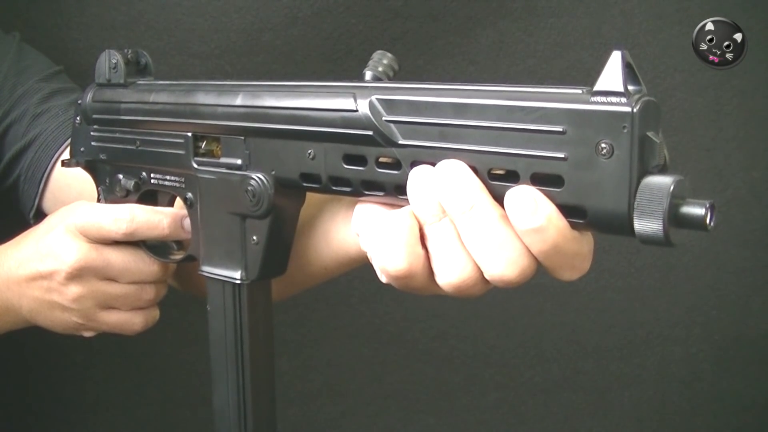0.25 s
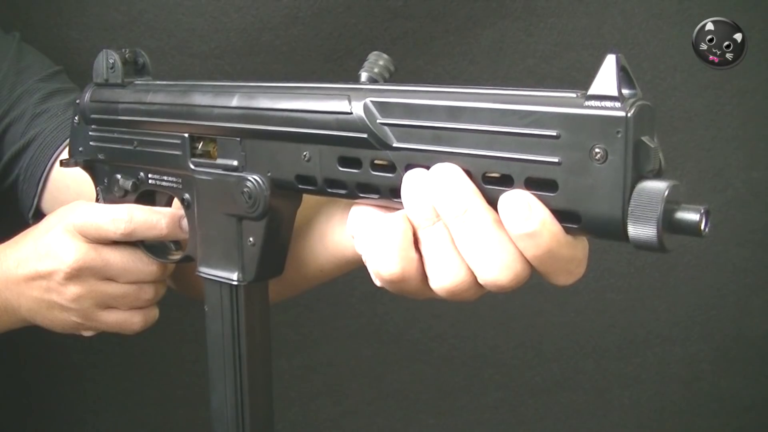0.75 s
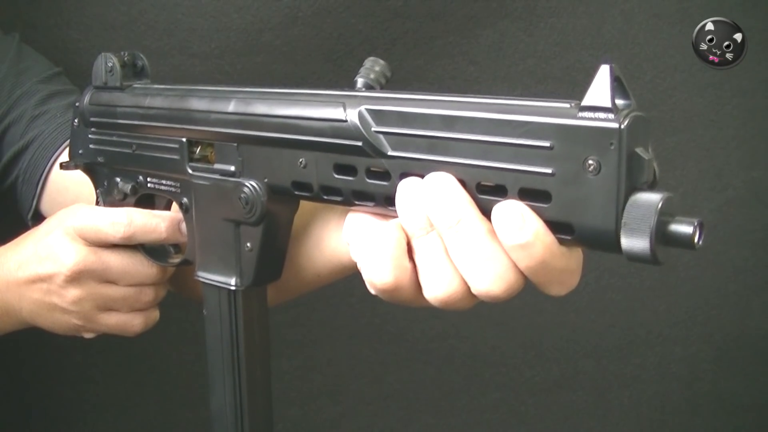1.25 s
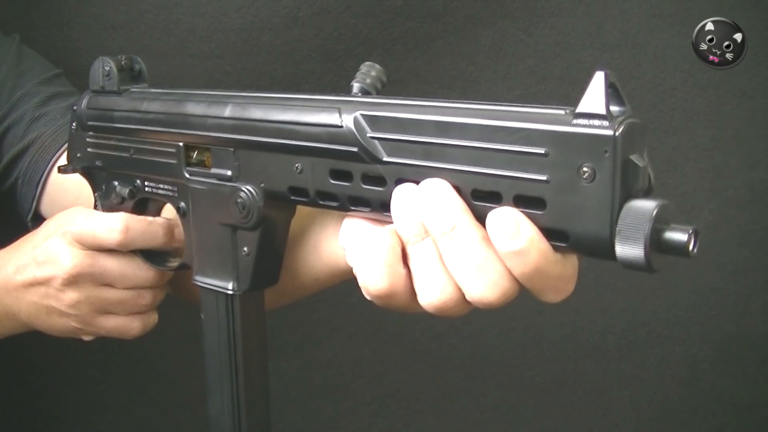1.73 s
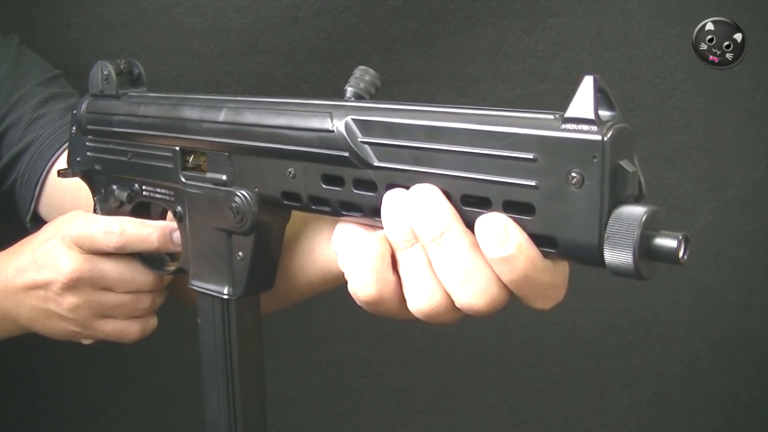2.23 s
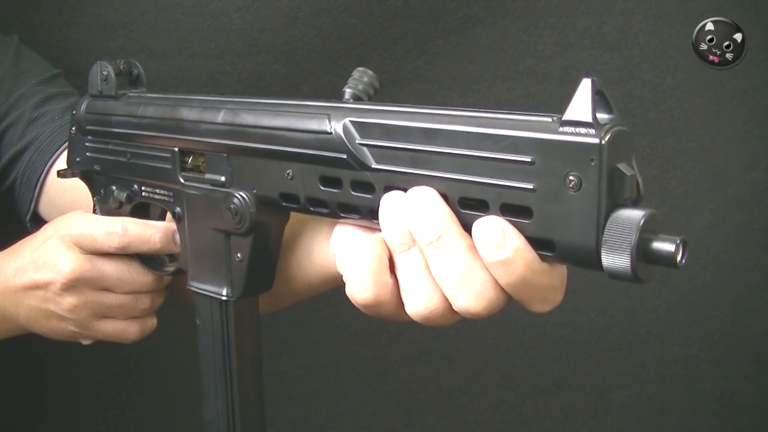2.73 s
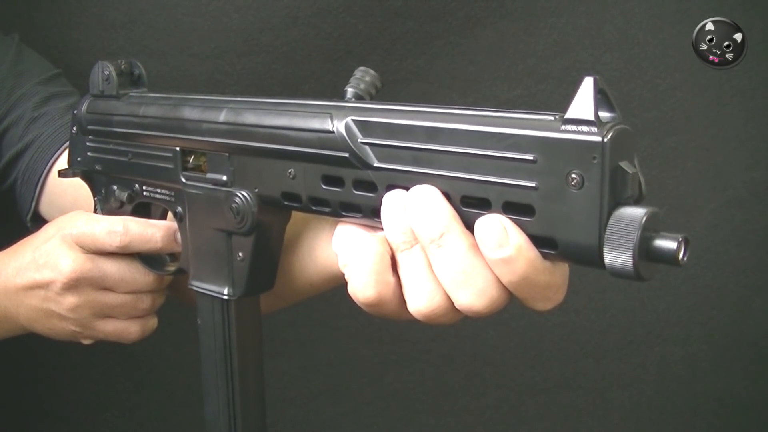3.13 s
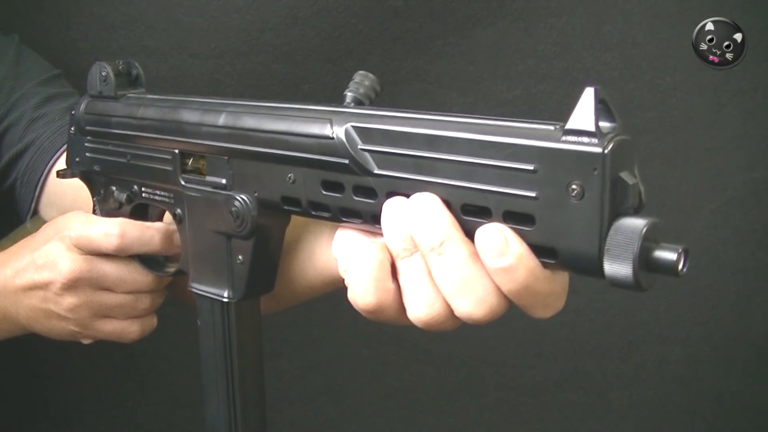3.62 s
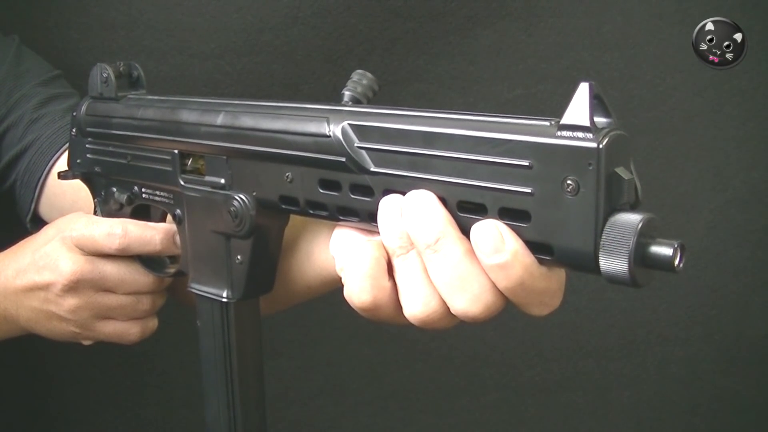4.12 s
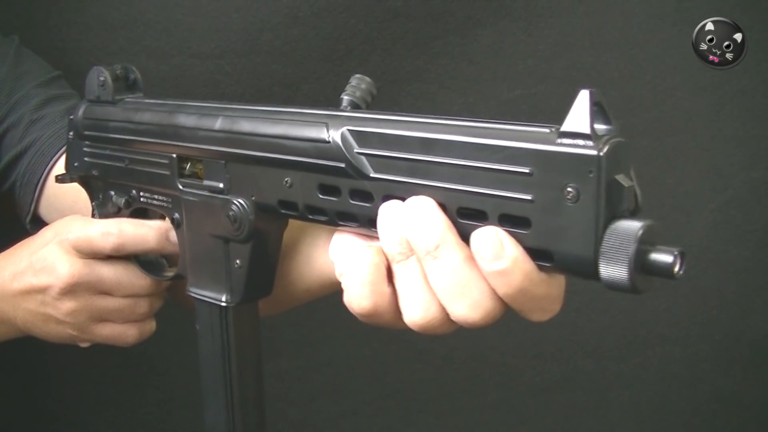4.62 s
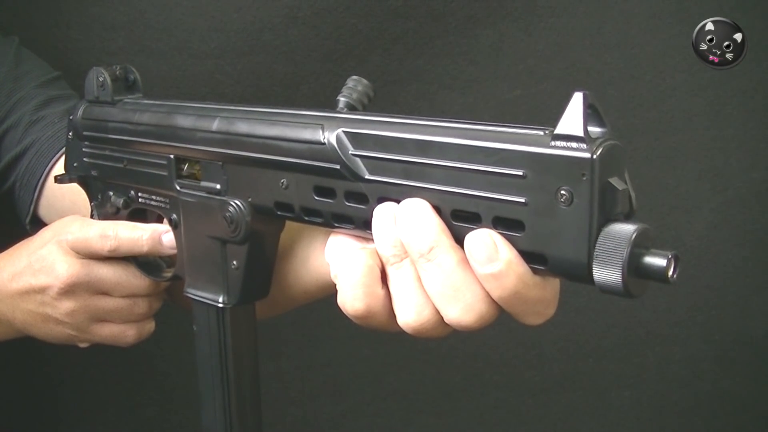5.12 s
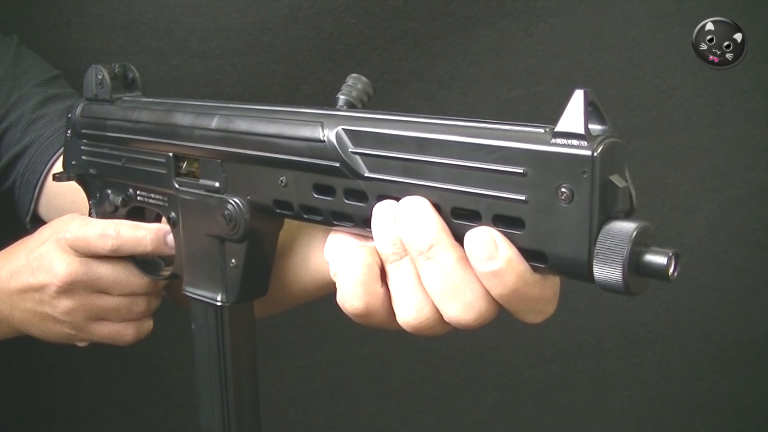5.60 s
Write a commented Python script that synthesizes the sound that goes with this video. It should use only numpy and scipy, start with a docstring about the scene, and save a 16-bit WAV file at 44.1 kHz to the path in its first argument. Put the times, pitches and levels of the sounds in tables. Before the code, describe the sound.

Close and almost mono: a bouncing case spins down to a fine rattle, then a trigger tick and a hard gas pop with metal bolt slam. Brass pings on the floor. A second single shot follows, then four rapid shots about a fifth of a second apart, ending in a clatter of cases and dull thuds. Short indoor reverberation, loud moments squeezed.

```python
"""A gas-driven replica submachine gun fires two single shots and a burst of four in a small furnished room.
Each shot: the bolt is released and slams home, the muzzle pops, gas blows the bolt back and brass flies out.
Pops are damped pressure pulses; struck bodies are coloured clicks, fading chatter and decaying modes.
Cases bounce and rattle on a hard floor or thud on something soft and hollow; noise makes the room's tail.
A near-mono microphone with two ports adds a faint hush, and a limiter holds loud passages down."""
import sys
import numpy as np
from scipy import signal
from scipy.fft import rfft, irfft
from scipy.io import wavfile
from scipy.ndimage import uniform_filter1d

SR = 44100
rng = np.random.default_rng(int(sys.argv[2]) if len(sys.argv) > 2 else 0)


def gain_from_decibels(decibels):
    """Convert decibel values to linear amplitude factors."""
    exponent = np.asarray(decibels, float) / 20
    return 10 ** exponent


def put_to_file(sound):
    """Save the sound as 16-bit audio at rate SR, in the file named by the first command-line argument."""
    columns = np.atleast_2d(sound).T  # one column per channel
    safe = np.clip(columns, -1, 1)
    whole_steps = np.round(safe * 32767)
    wavfile.write(sys.argv[1], SR, whole_steps.astype(np.int16))


N = 258426
TIME = np.arange(N) / SR

# Muzzle pops: [t/s, pop level/dB, hammer level/dB, breech knock level/dB]
SHOTS = [(1.6661, -3, -5.5, -14.5), (3.5671, -4, -8.5, -3.5), (4.3236, -2.5, -11, -2),
         (4.5354, -6.5, -12, -2), (4.7339, -7, -16, -9), (4.9224, -4, -1.5, -6)]
HAMMER_S, KNOCK_S = -0.004, 0.0167   # after the pop
# Bolt travel after a pop: [t after pop/s, relative rattle level/dB]
BOLT_TRAVEL = [(0, 23), (.01, -12.5), (.03, -0.5), (0.062, -1), (.09, -1.5), (.12, -17), (.16, -30),
               (.2, -22)]
BLOW_BACK_DB = -23.5
# Recoil spring modes: [f/Hz, level/dB, t60/s]
SPRING_MODES = [(775, -44, 1.1), (1580, -52, 2.5), (4650, -52, 1.)]
# Bolt meets its rear stop and rebounds: [t/s, level/dB, rebound delay/s, rebound level/dB]
REAR_STOP = [(1.738, -15.5, .0036, -3), (3.6391, -8.5, 0.011, -3.5), (4.4009, -5.5, 0.0058, -5.5),
             (4.6161, -0.5, 0.011, -30), (4.8094, 1, 0.0073, -11), (5.005, -0.5, .0077, -9)]
# Looser clacks of bolt and ejector: [t/s, level/dB, room feed/dB]
CLACKS = [(1.7839, -3, -3), (1.8008, -7, -25), (4.4315, -0.5, -24), (4.4472, -2.5, -4), (4.4822, -16, -9),
          (4.6735, -17, -2), (4.8737, -13, 1.5), (5.0256, -10.5, 4)]
CLACK_HARDNESS_DB, CLACK_RING_DB = -5.5, -16   # per octave; relative to the mode table
# Trigger taken up or let go: [t/s, level/dB]
TRIGGER = [(1.6103, -25), (3.4707, -27.5), (3.8326, -12), (4.2744, -37.5)]
# Sear slips before each shot and touches again: [t/s, level/dB, second touch delay/s]
SEAR_RELEASE = [(1.6338, -14, .014), (3.4971, -16.5, 0.014), (4.2926, -10.5, 0.0093), (4.5053, -9, .0115),
                (4.7001, -8, 0.02), (4.8967, -12, .0101)]
RETOUCH_LOSS_DB = 2
BOUNCES = [(0.0922, -2, -2.3, -2, None), (0.3689, -2, -2.5, -7.5, 4650), (0.5425, -7.5, -3.5, -5.5, None),
           (0.669, -3.5, -4, -7, 4150), (0.7867, -10.5, -4, -5.5, None), (0.8854, -9.5, -4.5, -0.3, None),
           (2.0882, 0, -2, -2, None), (2.2803, -2.5, -4, -2.5, None), (2.8222, -2, -4, -4.5, None),
           (3.7855, -20.5, -1, -13, None), (4.7237, -1, 6, -7, None), (5.1378, 1.5, -2, -3, 1280),
           (5.2338, -4, -2.5, -6.5, 2660), (5.264, -4, -6, -1.5, 4630), (5.3001, -4, -7, -20, 1280),
           (5.304, -2.5, -6.5, -6, None), (5.3177, -5.5, -2.5, -4.5, None),
           (5.4583, -10.5, -3.2, -3.5, None), (5.4623, -4, -2.9, -5, None), (5.548, -8.5, -5, -7.5, 2000),
           (5.5693, -4.5, -3.5, -5, None), (5.5714, 0, -4.5, -4, None), (5.5857, -7, -6, -27, 4650),
           (5.6212, -15.5, -6, -3.5, 4650), (5.7042, -4, -6, -3.5, None), (5.7343, -3, -2.8, -5, None),
           (5.8131, -10, -5.5, -6.5, None), (5.8408, -6.5, -1, -8, None)]
BOUNCE_RING_DB = -11
# One case rocks from end to end: [t/s, level/dB]
TAPS = [(0.9181, -30), (0.9388, -16), (0.9851, -12.5), (1.0307, -19), (1.0741, -16.5), (1.0978, -22),
        (1.1444, -18.5), (1.1563, -19), (1.1905, -22.5), (1.2232, -21.5), (1.2326, -21), (1.2633, -25),
        (1.2832, -19), (1.2962, -24.5), (1.3239, -29), (1.338, -25), (1.3468, -29), (1.3806, -23)]
SETTLE_S, SETTLE_GAP_S, GAP_SHRINKS = 1.4241, 0.0225, 0.88   # first tap; first gap; ratio of gaps
SETTLE_DB, SETTLE_LOSS_DB = -26.5, 1.3   # first tap; loss per tap
# A case rocking to rest on the floor: [t/s, rattle level/dB]
ROCKING = [(1.0, -92), (1.25, -56.5), (1.45, -56), (1.53, -62.5), (1.58, -59)]
# Cases on something soft and hollow: [t/s, level/dB, room feed/dB, ring/dB, favoured f/Hz]
THUDS = [(0.1904, -16.5, -0.3, -26, 1000), (0.21, -28.5, 2, -5.5, 1000), (2.475, -41, 2, 1.5, 290),
         (2.58, -28, -2, -16, 380), (2.9836, -40, -7, 6.5, 150), (3.0744, -47.5, -6, -8, 290),
         (3.1472, -40.5, -11.5, -1.5, 380), (3.2369, -36.5, 2.5, 5, 520), (3.3003, -40, -6, -8, 380),
         (3.3552, -45.5, 6, 0, 290), (3.8967, -10.5, -1.7, -12, 520), (4.001, -40, 0, -6.5, 290),
         (4.839, -9, 0, -2.5, 380), (4.8825, -18.5, 4, 4.5, 1250), (5.036, -11, 4, 1, 380),
         (5.1306, -17, -20, -6, 1030), (5.2801, -17, 7, -9, 1320), (5.392, -17.5, 5, 5, 520),
         (5.414, -2, -4, -32, 1000), (5.4363, -15.5, 2, -24, 1250), (5.781, -12, -0.5, -1, 800)]
THUD_HARDNESS_DB, THUD_HARDER_DB = -1.06, 2.55   # tilt at 1 kHz; its change per octave of the favoured mode

STOP_TOUCH = (-4.2, -4, -5.5, 2104)
REBOUND_TOUCH = (-5, -6, 0, 1049)
TRIGGER_TOUCH = (-.8, -5, -13, None)
SEAR_TOUCH = (1.5, -2, -10.5, 2405)
SEAR_RETOUCH = (-4, -8, -9, 2403.5)
TAP_TOUCH = (-4.5, -7, -12, 360)

# Modes of gun, sear, case and soft body that outlast the crack: [nominal f/Hz, relative level/dB, t60/s]
GUN_MODES = [(597, -13.5, 0.096), (1123, -36, 0.092), (1352, -24, 0.1), (2023, -17, 0.045),
             (2473, -16.5, 0.03), (3100, -17, 0.0075), (4460, -19, 0.0069), (8210, -17, 0.0074),
             (10100, -28.5, .01)]
SEAR_MODES = [(1050, -13, .025), (2150, -19, .02), (2400, -11, .025)]
CASE_MODES = [(370, -26, .08), (1280, -26, .09), (2000, -31, .04), (2650, -28, .06), (3450, -31, .04),
              (4150, -33, .04), (4650, -33, .05), (5500, -31, .03), (6200, -31, .035)]
SOFT_MODES = [(150, -21, .08), (290, -19, .09), (380, -15, .15), (520, -19, .06), (800, -22, .04),
              (1000, -23, .04), (1250, -27, .03)]
FAVOUR_DB = 12.0   # how far the mode nearest the point of contact stands out
# Crack colour of gun, sear, case and soft body before the hardness tilt: [f/Hz, relative level/dB]
GUN_CRACK = [(60, -54), (250, -41.5), (600, -17.5), (1100, -6), (2200, 0), (4000, 0), (6500, -3.5),
             (9000, -3.5), (12000, -17), (16000, -40)]
SEAR_CRACK = [(60, -74), (400, -12.5), (1000, -1.5), (1600, -1.5), (2300, 6.5), (3200, -6.5), (6000, -16.5),
              (11000, -29), (16000, -45)]
CASE_CRACK = [(60, -67.5), (200, -29), (400, -19), (900, -16), (1600, -3.5), (2700, 1), (4500, 2),
              (6500, -1), (9500, -12.5), (12500, -31), (16000, -44)]
SOFT_CRACK = [(40, -70), (100, -57.5), (200, -15), (400, -6), (800, -5), (1500, -8.5), (2500, -18),
              (5000, -31), (16000, -52)]

# Reverberation of the furnished room: [f/Hz, t60/s]
ROOM_T60 = [(150, 0.094), (500, 0.23), (1500, 0.22), (4000, 0.22), (9000, .17), (14000, 0.21)]
ROOM_EDGES_HZ = 32 * 2 ** np.arange(0, 9.1, 0.5)
ECHOES_PER_S, ECHO_DB = 300, 10   # near surfaces stand out of the tail
# Spectrum of the microphone hush: [f/Hz, relative level/dB]
HUSH_COLOUR = [(12, -53), (20, -15), (86, -1), (154, 4), (204, 1.5), (270, 3.5), (301, -1.5), (1480, -9),
               (1860, -10), (3530, -13.5), (16000, -32)]
HUSH_DB = -60
# Microphone imbalance: [f/Hz, left minus right level/dB]
PORT_LEAN = [(60, -4), (240, -3.0), (950, -2.5), (3770, -1.0), (15000, 1)]


def rms_one(x):
    """Normalization: the root mean square becomes one."""
    return x / np.sqrt(np.mean(x ** 2) + 1e-20)


def at_hz(points, hz):
    """Interpolation linear in log frequency."""
    f, value = np.transpose(points)
    return np.interp(np.log(hz), np.log(f), value)


def band(x, low_hz, high_hz):
    """Band-pass filtering: a Butterworth resonator keeps one range of frequencies."""
    return signal.sosfilt(signal.butter(2, [low_hz, high_hz], "band", fs=SR, output="sos"), x)


def add(out, x, s):
    """Superposition: pressures add from time s onward."""
    i = round(s * SR)
    out[..., i:i + x.shape[-1]] += x[..., :N - i]


def coloured(x, points, hardness_db=0):
    """Zero-phase filtering: gain in dB over frequency, tilted about 2 kHz down to 100 Hz."""
    size = x.shape[-1]
    hz = np.maximum(np.arange(size // 2 + 1) * SR / size, 1)
    tilt = hardness_db * np.log2(np.maximum(hz, 100) / 2000)
    return irfft(rfft(x) * gain_from_decibels(at_hz(points, hz) + tilt), size)


def contacts(events, crack, modes, chatter_s, grit_db, colour_db):
    """Impact excitation: a click, decaying chatter and damped modes; returns direct sound and room feed.
    Rows: t/s, level/dB, hardness/(dB per octave), room feed/dB, ring/dB, favoured f/Hz."""
    hz, db, t60 = np.transpose(modes)[:, :, None]
    lead, t, out = 256, np.arange(4096) / SR, np.zeros((2, N))
    chance = rng.standard_normal((len(events), 2, len(modes), 1))
    grit = rng.standard_normal((len(events), len(t)))
    for event, (tune, share), noise in zip(events, chance, grit):
        s, level_db, hardness, room_db, ring_db, best_hz = event
        touches = gain_from_decibels(grit_db - 60 * t / chatter_s) * noise * np.abs(noise)   # spiky: a few stand out
        touches[0] = 1
        impulses = np.roll([t == 0, touches], lead, axis=1)
        click, blow = coloured(impulses, crack, hardness)

        favour = FAVOUR_DB * np.exp(-(np.log2(hz / best_hz) / 0.08) ** 2) if best_hz else 0
        # every blow finds the modes a little differently
        gain = gain_from_decibels(db + ring_db + favour + 2 * share - 60 * t / t60)
        partials = gain * np.sin(2 * np.pi * hz * (1 + 0.012 * tune) * t)
        ringing = np.roll(band(partials.sum(axis=0), 0.59 * hz.min(), 19000), lead)

        if best_hz:   # the crack leans on the favoured mode
            pair = np.array([click, blow])
            click, blow = pair + gain_from_decibels(colour_db) * band(pair, best_hz / 1.045, best_hz * 1.045)
        # the walls blend the chatter into one even colour: the room gets a click of equal energy
        click = click * np.sqrt(np.sum(blow ** 2) / np.sum(click ** 2))
        both = np.array([blow, click]) / np.abs(blow).max() + ringing
        both[:, :lead] *= np.linspace(0, 1, lead) ** 6   # fades in up to the touch
        add(out, both * gain_from_decibels([[level_db], [level_db + room_db]]), s - lead / SR)
    return out


def rattle(level_db, crack, per_s, spread_db):
    """Random impact train: dense uneven clicks in the colour of a body."""
    born = rng.random(N) < per_s / SR
    heights = gain_from_decibels(spread_db * np.minimum(rng.exponential(1, N), 4))
    clicks = born * heights * rng.choice([-1, 1], N)
    return rms_one(coloured(clicks, crack, hardness_db=-8.5)) * gain_from_decibels(level_db)


def muzzle():
    """Pulse radiation: a push, a deep suck and a low thump, then a turbulent spit of gas."""
    t, out = np.arange(3000) / SR, np.zeros(N)
    centre_s = 0.0015
    since = t - centre_s
    pop = -np.cos(2 * np.pi * 1400 * since) * np.exp(-(since / 0.00042) ** 2)
    thump = gain_from_decibels(-31) * np.sin(2 * np.pi * 150 * t) * gain_from_decibels(-60 * t / 0.06)
    for s, db, *_ in SHOTS:
        gas = band(rng.standard_normal(len(t)), 6500, 11000)
        spit = gas * (since > 0) * gain_from_decibels(-3 - 60 * since / 0.047)
        add(out, gain_from_decibels(db) * (pop + thump + spit), s - centre_s)
    return out


def blow_back():
    """Forced and free vibration: gas and sliding bolt rattle the receiver; the spring's coils ring and beat."""
    after, shape_db = np.transpose(BOLT_TRAVEL)
    level, spring, t = np.zeros(N), np.zeros(N), TIME[:SR]
    for s, *_ in SHOTS:
        level += gain_from_decibels(BLOW_BACK_DB + np.interp(TIME - s, after, shape_db, -120, -120))
        for hz, mode_db, t60 in SPRING_MODES:
            coil_hz = hz * (1 + 0.012 * rng.standard_normal((3, 1)))   # slight detuning makes beats
            coils = np.sin(2 * np.pi * (coil_hz * t + rng.random((3, 1))))
            add(spring, gain_from_decibels(mode_db - 60 * t / t60) * coils.sum(axis=0) / 2, s)
    return level * rattle(0, GUN_CRACK, per_s=4000, spread_db=3.5) + spring


def bolt():
    """Collision of metal masses: hammer, breech knock, rear stop, rebound and loose clacks."""
    rows = [(s + HAMMER_S, db, -2.5, -4, -9, None) for s, _, db, _ in SHOTS]
    rows += [(s + KNOCK_S, db, -3.5, -4, -6, 2100) for s, _, _, db in SHOTS]
    rows += [(s, db, *STOP_TOUCH) for s, db, *_ in REAR_STOP]
    rows += [(s + later, db, *REBOUND_TOUCH) for s, _, later, db in REAR_STOP]
    rows += [(s, db, CLACK_HARDNESS_DB, room_db, CLACK_RING_DB, None) for s, db, room_db in CLACKS]
    return contacts(rows, GUN_CRACK, GUN_MODES, chatter_s=0.02, grit_db=-2, colour_db=0)


def sear():
    """Impact of small parts: trigger ticks, and two touches each time the bolt is let go."""
    rows = [(*row, *TRIGGER_TOUCH) for row in TRIGGER]
    rows += [(s, db, *SEAR_TOUCH) for s, db, _ in SEAR_RELEASE]
    rows += [(s + later, db - RETOUCH_LOSS_DB, *SEAR_RETOUCH) for s, db, later in SEAR_RELEASE]
    return contacts(rows, SEAR_CRACK, SEAR_MODES, chatter_s=0.02, grit_db=-5, colour_db=-6)


def cases(count=7):
    """Repeated impact with loss: bounces, rocking taps, settling at shrinking gaps and a fine rattle."""
    k = np.arange(count)
    settle_s = SETTLE_S + SETTLE_GAP_S * (1 - GAP_SHRINKS ** k) / (1 - GAP_SHRINKS)   # geometric series
    settle = zip(settle_s, SETTLE_DB - SETTLE_LOSS_DB * k)
    rows = [(*row, BOUNCE_RING_DB, hz) for *row, hz in BOUNCES]
    rows += [(*row, *TAP_TOUCH) for row in [*TAPS, *settle]]
    rocking_db = np.interp(TIME, *np.transpose(ROCKING), -120, -120)
    fine = rattle(rocking_db, CASE_CRACK, per_s=740, spread_db=3)
    return contacts(rows, CASE_CRACK, CASE_MODES, chatter_s=0.015, grit_db=-9, colour_db=1.5) + fine


def thuds():
    """Compliant impact: the lower a soft spot rings, the duller the landing."""
    rows = []
    for s, db, room_db, ring_db, hz in THUDS:
        hardness = THUD_HARDNESS_DB + THUD_HARDER_DB * np.log2(hz / 1000)
        rows.append((s, db, hardness, room_db, ring_db, hz))
    return contacts(rows, SOFT_CRACK, SOFT_MODES, chatter_s=0.076, grit_db=12.5, colour_db=-0.5)


def room(x, wet_db, apart_db):
    """Diffuse reverberation: a dense tail builds up in a few ms and dies band by band; returns mid and side."""
    t = TIME[:SR // 2]
    echoes = gain_from_decibels(ECHO_DB * (rng.random(len(t)) < ECHOES_PER_S / SR))
    white = rng.standard_normal((2, 2, len(t))) * echoes
    tail = np.zeros((2, len(t)))
    for k, (low, high) in enumerate(zip(ROOM_EDGES_HZ, ROOM_EDGES_HZ[1:])):
        decay = gain_from_decibels(-60 * t / at_hz(ROOM_T60, np.sqrt(low * high)))
        tail += band(white[k % 2], low, high) * decay   # neighbouring bands use separate noise
    tail *= 1 - np.exp(-(t / 0.0047) ** 2)
    tail = tail / np.sqrt(np.sum(tail[0] ** 2)) * gain_from_decibels([[wet_db], [wet_db + apart_db]])
    return signal.fftconvolve(x[None], tail, axes=1)[:, :N]


def hush():
    """Stationary random noise: the microphone's coloured hush as mid and a weaker side."""
    noise = rms_one(coloured(rng.standard_normal((2, N)), HUSH_COLOUR))
    return gain_from_decibels(HUSH_DB) * noise * gain_from_decibels([[0], [-9]])


def limiter(x, from_db, share, attack_s, release_db_s):
    """Gain control: loud passages lower the gain just after the first spike; it recovers at a steady rate."""
    power = uniform_filter1d(np.mean(x ** 2, axis=0), 200, origin=99)   # window reaches into the past
    over = share * np.maximum(10 * np.log10(power + 1e-12) - from_db, 0)
    release = release_db_s * TIME
    held = np.maximum.accumulate(over + release) - release
    r = np.exp(-1 / (attack_s * SR))
    return x * gain_from_decibels(-signal.lfilter([1 - r], [1, -r], held))


def scene():
    """Superposition of direct and reverberant fields: gun, brass and thuds, each with its share of the room."""
    pops, slide = muzzle(), blow_back()
    # rows: direct sound, room feed
    gun = sear() + bolt() + pops * gain_from_decibels([[0], [-11]]) + slide * gain_from_decibels([[0], [-3]])
    brass, soft = cases(), thuds()
    mid, side = (room(gun[1], wet_db=0.1, apart_db=-15.5)
                 + room(brass[1], wet_db=2.0, apart_db=-14.5)
                 + room(soft[1], wet_db=-7.0, apart_db=-14.5))
    mid = mid + gun[0] + brass[0] + soft[0]
    return np.array([mid + side, mid - side])


def top_cut(x):
    """Nothing passes above the cut-off."""
    return signal.sosfilt(signal.butter(12, 16440, fs=SR, output="sos"), x)


def record(dry):
    """Transduction: rumble is cut, hush added, the left port loses bass to the right; peaks are rounded."""
    dry = signal.sosfilt(signal.butter(3, 70, "high", fs=SR, output="sos"), dry)
    mid, side = hush()
    left = coloured(dry[0] + mid + side, [(hz, db / 2) for hz, db in PORT_LEAN])
    right = coloured(dry[1] + mid - side, [(hz, -db / 2) for hz, db in PORT_LEAN])
    held = limiter(np.array([left, right]), from_db=-21.5, share=0.46, attack_s=0.00076, release_db_s=126.5)
    rounded = np.tanh(held)
    mix = signal.sosfilt(signal.butter(4, 13500, fs=SR, output="sos"), rounded)   # the top fades
    mix = signal.sosfilt(signal.butter(2, 35, "high", fs=SR, output="sos"), mix)
    return top_cut(mix)


dry = scene()
out = record(dry)
put_to_file(out)
```